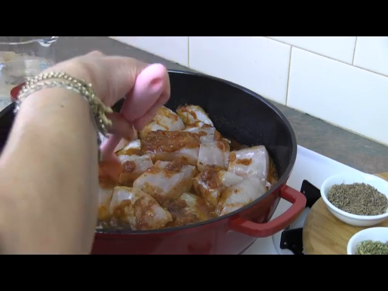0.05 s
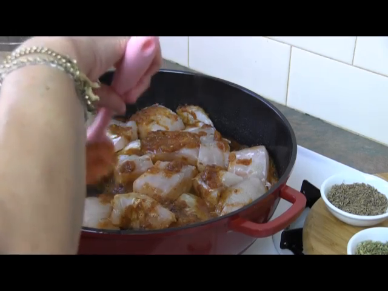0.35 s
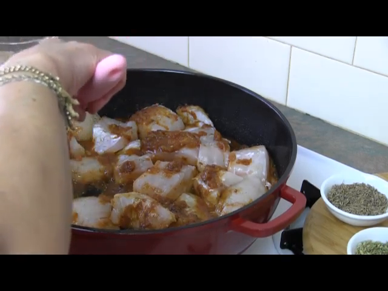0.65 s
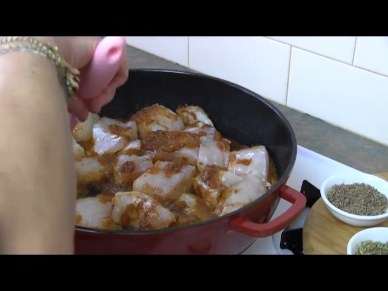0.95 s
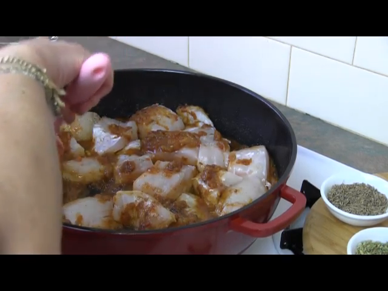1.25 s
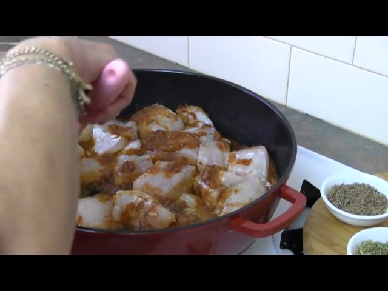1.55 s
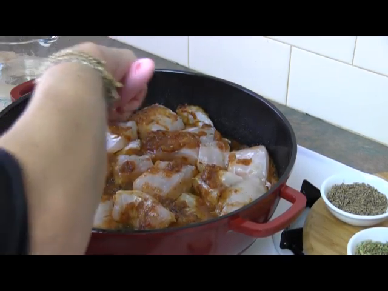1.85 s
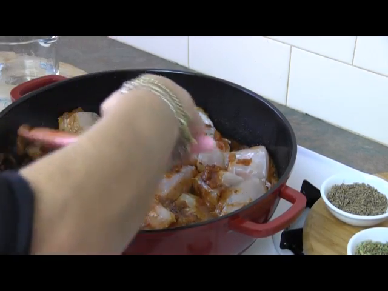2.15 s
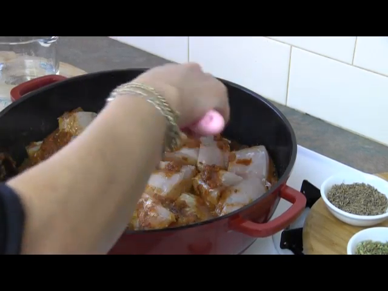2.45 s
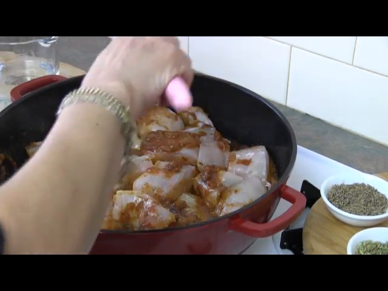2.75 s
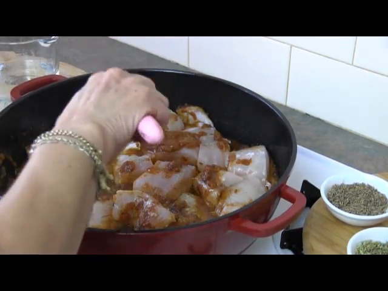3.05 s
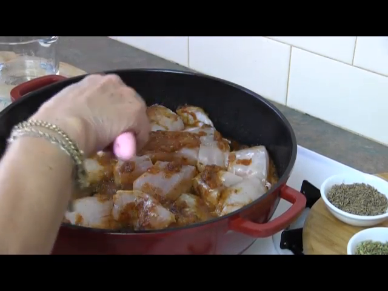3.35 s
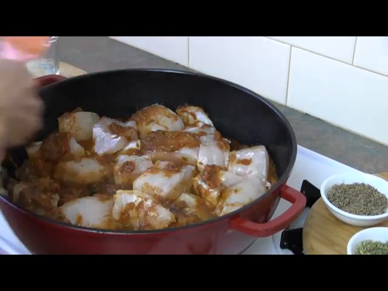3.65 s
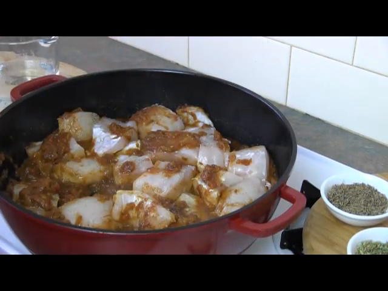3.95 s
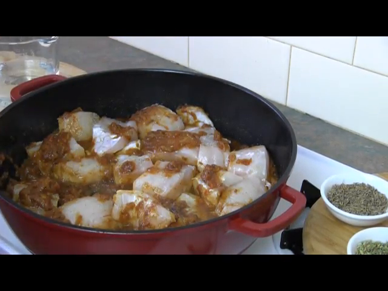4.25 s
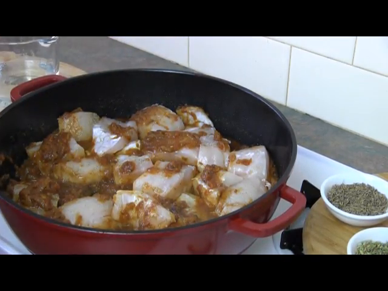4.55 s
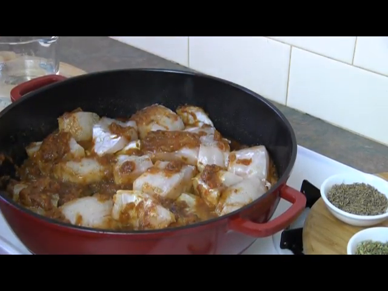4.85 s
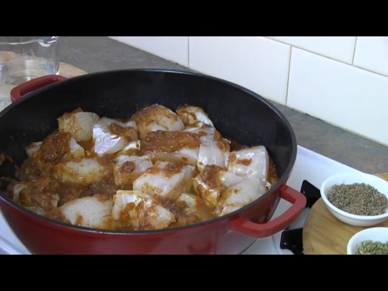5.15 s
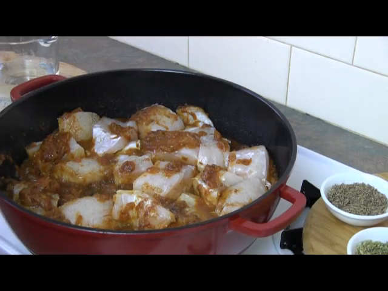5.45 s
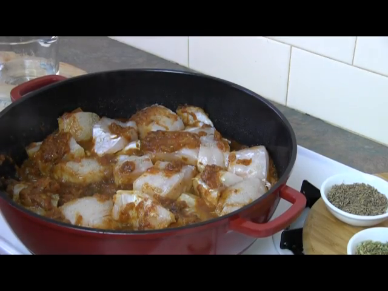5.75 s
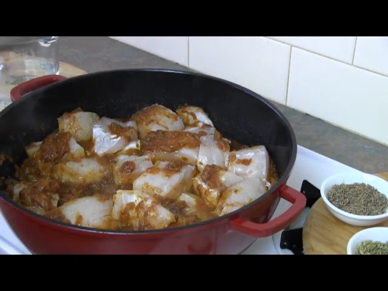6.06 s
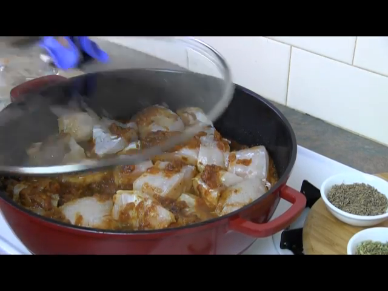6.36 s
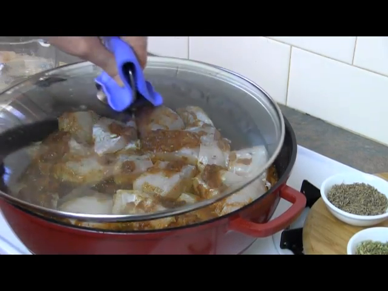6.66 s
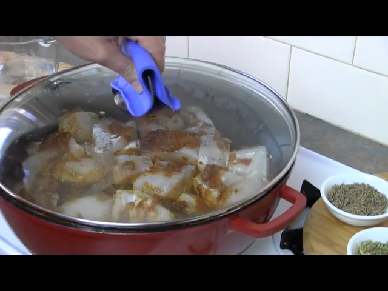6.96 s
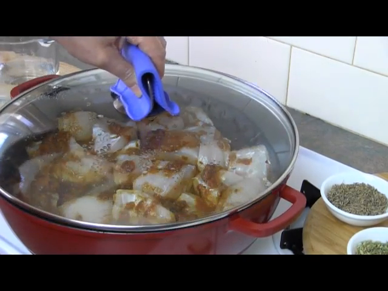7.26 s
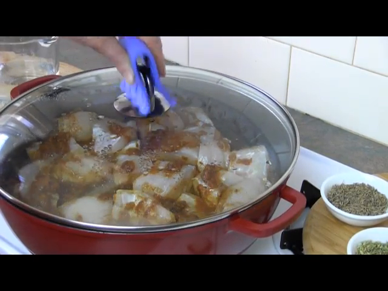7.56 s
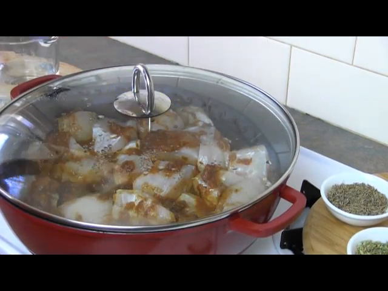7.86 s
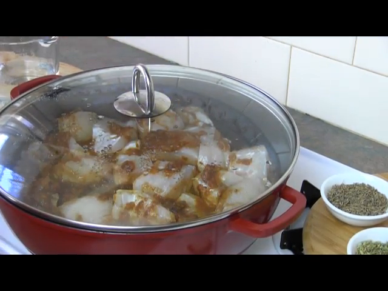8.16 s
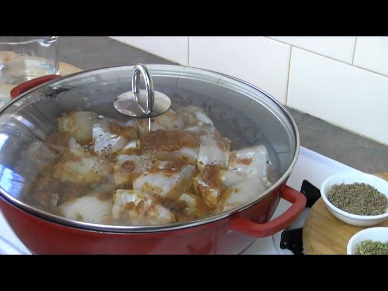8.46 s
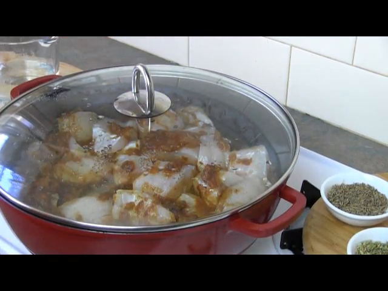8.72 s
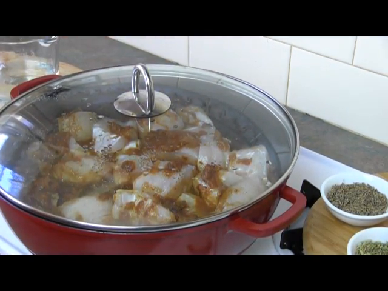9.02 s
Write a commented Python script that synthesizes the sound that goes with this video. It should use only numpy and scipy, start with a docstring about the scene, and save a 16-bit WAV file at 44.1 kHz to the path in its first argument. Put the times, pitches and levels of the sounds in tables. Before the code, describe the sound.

Sauce squelches softly as a spoon pats chicken in a faintly simmering pan. Chain bracelets tinkle brightly, then the spoon clacks onto its rest among a few dull knocks. After a soft cloth rustle, a glass lid strikes the iron pan, rocks, slides and drops into place with a sharp, ringing clatter. A few more bracelet clinks follow. The microphone is close to the stove in a small tiled kitchen.

```python
"""A small tiled kitchen, microphone close to the stove, over a steady low noise and a faint simmer.
A cook pats chicken pieces in an enamelled iron pan; the sauce squelches as the spoon lifts, and
the links of her chain bracelets tick and ring. She lays the spoon aside and fetches a glass lid.
It strikes the pan, rocks, slides and drops into its seat, each contact ringing glass, rim and iron."""
import sys
import numpy as np
from scipy import signal
from scipy.fft import rfft, irfft, next_fast_len
from scipy.io import wavfile
from scipy.ndimage import uniform_filter1d

SR = 44100
rng = np.random.default_rng(int(sys.argv[2]) if len(sys.argv) > 2 else 0)


def master_out(mix):
    """Clip the mix to full scale and print it as 16-bit PCM to the path in sys.argv[1]."""
    frames = np.transpose(np.atleast_2d(mix))
    ceiling = np.clip(frames, -1, 1)
    pcm = np.round(ceiling * 32767).astype(np.int16)
    wavfile.write(sys.argv[1], SR, pcm)


N = 409688


def amp(db):
    """Decibels to gain."""
    return 10 ** (np.asarray(db) / 20)


def unit(x):
    """Scales to an rms of 1."""
    return x / np.sqrt(np.mean(x ** 2) + 1e-20)


def read(points, hz):
    """Reads a curve on a log-frequency axis."""
    f, value = np.transpose(points)
    return np.interp(np.log(hz + 1), np.log(f), value)


def add(mix, s, sound):
    """Mixes a sound in at s seconds."""
    part = mix[:, max(round(s * SR), 0):][:, :sound.shape[-1]]
    part += sound[..., :part.shape[1]]


def noise(colour, size):
    """Two partly alike channels of noise at an rms of 1; colour gives dB for each Hz."""
    # Each row: frequency in Hz, correlation between left and right.
    likeness = [(60, 0.98), (130, 0.88), (260, 0.62), (700, 0.43), (2500, 0.62), (10000, 0.87)]
    hz = np.fft.rfftfreq(size, 1 / SR)
    mid, side = rfft(rng.standard_normal((2, size)))
    alike = np.clip(read(likeness, hz), 0, 1)
    mid, side = mid * np.sqrt(1 + alike), side * np.sqrt(1 - alike)
    return unit(irfft(np.array([mid + side, mid - side]) * amp(colour(hz)), size))


def bed(colour):
    """Coloured noise as long as the scene."""
    return noise(colour, next_fast_len(N))[:, :N]


def hump(centre_hz, octaves):
    """The colour of one resonance with straight skirts."""
    return lambda hz: -12 * (np.hypot(1, np.log2((hz + 1) / centre_hz) / octaves) - 1)


def grain(depth_db, smooth_samples, size):
    """A gain that flickers at random."""
    flicker = unit(uniform_filter1d(rng.standard_normal(size), smooth_samples))
    return unit(amp(depth_db * flicker))


def decay(t, t60):
    """A gain that falls 60 dB in t60 seconds."""
    return np.exp(-np.log(1000) * t / t60)


def fade(x, t60s, stretch=1):
    """Lets each band die at its own speed."""
    hz, t, bands = signal.stft(x, SR, nperseg=256)
    bands = bands * decay(t, stretch * read(t60s, hz)[:, None])
    return signal.istft(bands, SR, nperseg=256)[1][:, :x.shape[1]]


def ring(hz, db, t60, t):
    """A sum of dying modes, alternating in sign."""
    sign = (-1) ** np.arange(len(hz))
    return (sign * amp(db)) @ (np.sin(2 * np.pi * np.outer(hz, t)) * decay(t, t60[:, None]))


def spells(rows, rest_db, ramp_s):
    """A gain that rises from rest, holds through each spell and falls back."""
    t = np.arange(N) / SR
    lifts_db = [(db - rest_db) * np.clip(1 + np.minimum(t - start, end - t) / ramp_s, 0, 1)
                for start, end, db in rows]
    return amp(rest_db + np.max(lifts_db, axis=0))


def taps(rows, rise_s, snap_db=-20, snap_s=0.0013):
    """Short, damped blows, each noise in one resonance, opened by a brief snap."""
    out, t = np.zeros((2, N)), np.arange(2 ** 14) / SR
    for s, db, centre_hz, octaves, t60 in rows:
        envelope = np.minimum(t / rise_s, 1) * decay(t, t60) + amp(snap_db) * np.exp(-t / snap_s)
        add(out, s, amp(db) * envelope * noise(hump(centre_hz, octaves), len(t)))
    return out


def room(x, gap_s=.003, build_s=0.027):
    """Reflections off the tiles build into a short, diffuse tail."""
    # Each row: frequency in Hz, the kitchen's t60 in seconds.
    room_t60 = [(100, 0.55), (400, 0.43), (1500, 0.45), (4000, 0.26), (12000, 0.34)]
    onset = np.clip((np.arange(SR) / SR - gap_s) / build_s, 0, 1)
    tail = fade(noise(np.zeros_like, SR) * onset, room_t60)
    return signal.fftconvolve(x, tail / np.linalg.norm(tail[0]), axes=1)[:, :N]


def room_tone(level_db=-52.5):
    """The steady low noise of the kitchen."""
    # Each row: frequency in Hz, relative noise density in dB.
    colour = [(22, -36), (55, -6), (105, -2.5), (170, -8.5), (460, -7.5), (580, -4), (760, -4), (880, -11),
              (1600, -14), (2300, -14), (4000, -21), (8000, -28.5), (16000, -42)]
    return amp(level_db) * bed(lambda hz: read(colour, hz))


def rumble(centre_hz=50):
    """A deep rumble comes and goes."""
    # Each row: start and end of a swell in seconds, level in dB.
    swells = [(0, 2.75, -57.5), (3.6, 5.1, -59.5), (8, 8.8, -62.5)]
    return spells(swells, rest_db=-68, ramp_s=0.27) * bed(hump(centre_hz, octaves=0.38))


def hum(centre_hz=77):
    """A low, wavering hum swells twice."""
    # Each row: start and end of a swell in seconds, level in dB.
    swells = [(3.58, 4.08, -48), (6.2, 6.85, -56.5)]
    band = signal.hilbert(bed(hump(centre_hz, octaves=.05))[0])
    evened = unit(band.real / np.sqrt(abs(band) ** 2 + 0.18))  # nearly steady in level
    return spells(swells, rest_db=-63.5, ramp_s=0.23) * evened


def simmer(hiss_db=-1, pop_db=-8, pops_per_s=60, pop_hz=4500):
    """The warming pan hisses and pops faintly; the level dips as the lid goes on."""
    # Each row: time in seconds, level of the simmer in dB.
    levels = [(0, -61.5), (6.8, -62), (7.5, -64.5), (9.29, -61)]
    # Each row: frequency in Hz, relative density of the hiss in dB.
    colour = [(1500, -6), (3000, -2.5), (6000, -1), (10000, -3), (15500, -9)]
    hiss = bed(lambda hz: read(colour, hz))
    pops = (rng.random(N) < pops_per_s / SR) * amp(7.7 * np.minimum(rng.exponential(1, N), 3))
    pop = noise(hump(pop_hz, octaves=1), size=256) * np.exp(-np.arange(256) / 40)
    crackle = unit(signal.oaconvolve(pops[None], pop, axes=1)[:, :N])
    gain = amp(np.interp(np.arange(N) / SR, *np.transpose(levels)))
    return (amp(hiss_db) * hiss + amp(pop_db) * crackle) * gain


def rustles():
    """Cloth and pot holder rub in soft, grainy swells."""
    # Each row: peak time in seconds, level in dB, centre in Hz, width in octaves, half-length in seconds.
    brushes = [(5.36, -53, 2070, 0.96, 0.33), (6.054, -56.5, 1970, 1.3, 0.3),
               (8.087, -44, 2050, 1.02, 0.024), (8.733, -46, 1760, 1.35, 0.018),
               (9.026, -50, 5600, 1.4, 0.039)]
    out, t = np.zeros((2, N)), np.arange(2 ** 16) / SR
    middle = t.mean()
    for s, db, centre_hz, octaves, half_s in brushes:
        swell = np.exp(-((t - middle) / half_s) ** 2)
        roughness = grain(depth_db=4, smooth_samples=150, size=len(t))
        add(out, s - middle, amp(db) * roughness * swell * noise(hump(centre_hz, octaves), len(t)))
    return out


def knocks(middling_hz=300, middling_octaves=0.72, widest_octaves=1.26):
    """Things bump on counter and stove; heavier ones sound lower and narrower."""
    # Each row: start in seconds, level in dB, centre in Hz, t60 in seconds.
    bumps = [(.148, -46, 1290, .19), (1.385, -47.5, 151, 0.49), (4.287, -41.5, 800, 0.059),
             (4.321, -44, 900, 0.11), (4.416, -37, 130, 0.096), (4.604, -27.5, 680, 0.18),
             (4.735, -29.5, 270, .2), (4.737, -36, 119, 0.21), (5.004, -39, 271, 0.24),
             (5.267, -37.5, 131, 0.047), (6.125, -44.5, 300, 0.17)]
    blows = [(s, db, hz, min(middling_octaves * (hz / middling_hz) ** 0.63, widest_octaves), t60)
             for s, db, hz, t60 in bumps]
    return taps(blows, rise_s=0.00078)


def spoon():
    """The spoon clacks onto its rest and settles, ringing briefly each time."""
    # Each row: a mode's frequency in Hz, relative level in dB, t60 in seconds.
    modes = [(524, -1, 0.29), (549, -2.5, 0.33), (700, 1, 0.088), (970, -24, 0.14), (1280, -7, 0.18),
             (1776, -7, 0.1), (2620, -13, .09), (3060, 2, 0.037)]
    # Each row: start in seconds, level in dB.
    blows = [(4.604, -34.5), (4.655, -47)]
    out, t = np.zeros((2, N)), np.arange(2 ** 14) / SR
    for s, db in blows:
        add(out, s, amp(db) * ring(*np.transpose(modes), t))
    return out


def sauce(start_s=.1, end_s=2.3, tick_db=-55, tick_hz=4560, octaves=0.28, t60=0.06):
    """Sticky sauce parts at each lift of the spoon, with small wet ticks at random in between."""
    # Each row: start in seconds, level in dB, centre in Hz.
    squelches = [(.122, -47, 9350), (.264, -46, 3340), (.365, -47, 3320), (.654, -47, 3330),
                 (1.174, -46, 2930), (1.581, -47, 3500), (1.82, -44, 6960), (1.953, -44, 3420),
                 (2.341, -47, 3400)]
    ticks = [(start_s + (end_s - start_s) * when,
              tick_db + 3.5 * (2 * size - 1),
              tick_hz * 2 ** (0.72 * (2 * pitch - 1))) for when, size, pitch in rng.random((18, 3))]
    blows = [(s, db, hz, octaves, t60) for s, db, hz in list(squelches) + ticks]
    return taps(blows, rise_s=0.0011, snap_db=-1.5)


def clink(upper_db, tick_db, rise_s, links=4, spread=0.0092, lag_s=.003):
    """A few nearly equal bracelet links ring in quick succession over one grainy tick."""
    # Each row: a link mode's frequency in Hz, relative level in dB, t60 in seconds.
    modes = [(9000, 0, .075), (10610, -17, .055), (11350, -14, .055), (11880, -12, .06), (15000, -20, .04)]
    # Each row: frequency in Hz, relative density of the tick in dB.
    tick_colour = [(2000, -16), (4000, -2), (6500, -2.5), (9000, 8.5), (12000, -2.5), (15500, -15)]
    hz, db, t60 = np.transpose(modes)
    ringing, t = np.zeros((2, 2 ** 12)), np.arange(2 ** 12) / SR
    for k in range(links):
        detune, luck = rng.standard_normal((2, len(hz)))
        tone = ring(hz * (1 + spread * detune), db + (upper_db + 2 * luck) * (hz > hz[0]), t60, t)
        channel_db = -3 * k + 4.4 * rng.standard_normal((2, 1))
        add(ringing, k * lag_s, amp(channel_db) * tone)
    roughness = grain(depth_db=3, smooth_samples=60, size=len(t))
    tick = noise(lambda f: read(tick_colour, f), len(t)) * roughness * np.exp(-t / 0.021)
    return (ringing / abs(ringing).max() + amp(tick_db) * tick) * np.minimum(t / rise_s, 1)


def bracelets(jingle_db=-4, touches_per_s=14, voices=6):
    """The chains clink clearly when the wrist jerks, and jingle lightly at random in between."""
    # Dry ticks of the finest chain.
    # Each row: start in seconds, level in dB, centre in Hz, width in octaves, t60 in seconds.
    chain_ticks = [(6.245, -39.5, 10400, .4, 0.12), (9.18, -42, 15000, .05, .22)]
    # Each row: start in seconds, level in dB, kind of touch.
    clear_clinks = [(.656, -40.5, "bright"), (2.238, -37, "pure"), (2.5117, -30.5, "pure"),
                    (2.533, -29, "chatter"), (2.5682, -32.5, "chatter"), (2.583, -26.5, "pure"),
                    (2.6068, -26.5, "pure"), (2.722, -30, "chatter"), (2.747, -25, "chatter"),
                    (2.768, -28, "chatter"), (2.9073, -33.5, "pure"), (3.016, -32.5, "pure"),
                    (3.14, -27, "pure"), (3.199, -31, "chatter"), (3.219, -23, "pure"),
                    (3.3294, -33, "pure"), (3.38, -24, "pure"), (3.428, -25, "bright"),
                    (3.554, -15, "bright"), (3.5945, -25.5, "pure"), (3.743, -26.5, "bright"),
                    (4.049, -26.5, "bright"), (8.931, -32, "pure"), (9.0098, -23.5, "bright"),
                    (9.2543, -34, "pure")]
    # Each kind of touch: gain of the upper modes in dB, of the tick in dB, rise in seconds.
    touches = {"pure": (-11, -17, 0.003), "bright": (2.52, -22, 0.004), "chatter": (-1, -11.5, .0013)}
    # Each row: start and end of a wrist movement in seconds, level in dB.
    wrist_moves = [(0, 2.5, -61.5), (2.3, 3.9, -49.5), (3.9, 6.2, -62), (9, 9.29, -47)]
    out = taps(chain_ticks, rise_s=0.0018, snap_db=0)
    for s, db, touch in clear_clinks:
        add(out, s, amp(db) * clink(*touches[touch]))
    jingle = np.zeros((2, N))
    for _ in range(voices):
        hits = rng.random(N) < touches_per_s / voices / SR
        strength = amp(5 * np.minimum(rng.exponential(1, N), 2))
        voice = clink(upper_db=5, tick_db=-11.5, rise_s=0.003)
        jingle += signal.oaconvolve((hits * strength)[None], voice, axes=1)[:, :N]
    return out + amp(jingle_db) * unit(jingle) * spells(wrist_moves, rest_db=-74.5, ramp_s=.15)


def tilt(hz, db_per_octave):
    """A slope in dB about 1 kHz, flat below 150 Hz."""
    return db_per_octave * np.log2(np.maximum(hz, 150) / 1000)


def clatter(position, slope, stretch, size, level_db=-2):
    """Dense, quickly dying overtones of the glass lid and its steel rim."""
    # Each row: frequency in Hz, then relative density in dB on one edge, rocking, sliding and seated.
    colours = [(49.6, -13, -24, -17, -19), (121, -27, -6, -4, -3.5), (320, 3, 1, -1, -4.5),
               (750, -7.5, -3.5, -4, -4.5), (1060, -7.5, -14, -15, -9.5), (1670, -13, -15.5, -12, -8),
               (2290, -3, -6.5, -4.5, -3), (3760, -11, -10.5, -4, -10.5), (5230, -19, -14, -10.5, -17),
               (5670, -19.5, -17, -14.5, -30), (8900, -35.5, -32, -26, -34.5), (15700, -63, -52, -42, -43)]
    # Each row: frequency in Hz, t60 in seconds before the stretch.
    t60s = [(80, 0.89), (400, 0.25), (1500, 0.24), (3000, 0.097), (6000, 0.13), (14000, 0.18)]
    colour = np.array(colours)[:, [0, position + 1]]
    overtones = noise(lambda hz: read(colour, hz) + tilt(hz, slope), size)
    return amp(level_db) * fade(overtones, t60s, stretch)


def lid(hard_db=-12.5, hard_rise_s=.0015, snap_db=-4, snap_rise_s=0.00055):
    """Each contact rings lid and pan; softer ones rise more slowly, sound duller and clatter longer."""
    # Modes of the lid on the pan. Each row: frequency in Hz, t60 in seconds,
    # then relative level in dB on one edge, rocking, sliding and seated.
    modes = [(134.5, 0.33, -36.5, -35, -39, -29), (155.5, 0.37, -28.5, -29, -38, -32),
             (193, 0.41, -49, -24.5, -41, -39), (250, 0.27, -28.5, -19, -22.5, -26),
             (297, 0.34, -55, -22, -30, -19), (372.7, 0.17, -7, -31, -49, -20.5),
             (394.9, 0.35, -21.5, -12.5, -38, -30), (591.6, 0.16, -14.5, -19, -31.5, -24),
             (667, 0.16, -17, -22, -47, -24), (700, 0.25, -32, -40, -46, -19),
             (741, 0.14, -16, -23, -31.5, -22), (771.6, 0.2, -37, -33, -28, -20.5),
             (1006, 0.24, -33, -40, -56, -31), (1150, 0.17, -42, -43, -56, -19.5),
             (1167, 0.27, -53, -32.5, -33, -33), (1237, 0.077, -23.5, -39, -44, -35),
             (1533, 0.21, -51, -38, -41.5, -23.5), (1965, 0.2, -22, -26, -43, -28),
             (2198, 0.11, -30, -50, -38, -29), (2385, 0.16, -18, -41, -46, -24),
             (2436, 0.14, -14.5, -29, -27, -31), (2580, 0.16, -34, -36, -36, -31),
             (2743, 0.065, -36, -35, -51, -38), (3060, 0.16, -50, -43, -29.5, -26),
             (3310, 0.23, -47, -52, -47, -37), (3310, 0.08, -31, -42, -51, -29),
             (3615, 0.044, -15, -28, -51, -30), (4320, 0.2, -37, -48, -35, -48)]
    # How the lid lies on the pan, in the order of those level columns.
    positions = ["edge", "rock", "slide", "seat"]
    # Each kind of contact: position, brightness in dB an octave, factor on the clatter's decay time.
    contacts = {"strike": ("edge", -1.1, 0.57), "graze": ("edge", 5.4, 0.62), "rock": ("rock", 0.53, .9),
                "scrape": ("slide", 7.2, 0.57), "slide": ("slide", .3, .5), "drop": ("seat", -.2, 0.7)}
    # The lid is picked up, strikes, rocks, slides and drops in.
    # Each row: start in seconds, kind of contact, gain of the ring in dB, of the clatter in dB.
    blows = [(5.001, "graze", -29.5, -37.5), (6.794, "strike", -1, -10.5), (6.7995, "graze", -18.5, -17.5),
             (6.881, "rock", -1.5, -14.5), (6.928, "rock", -21.5, -27), (6.985, "rock", -19.5, -27),
             (7.018, "slide", -13, -32), (7.131, "scrape", -22, -27), (7.141, "slide", .5, -21.5),
             (7.211, "slide", -10.5, -25), (7.222, "slide", -11.5, -36), (7.298, "slide", -18.5, -40),
             (7.377, "drop", -22, -31), (7.3876, "drop", -1.5, -9.5), (7.634, "drop", -31.5, -38)]
    out, t = np.zeros((2, N)), np.arange(2 ** 15) / SR
    hz, t60, *mode_db = np.transpose(modes)
    for s, contact, ring_db, clatter_db in blows:
        lie, brightness, stretch = contacts[contact]
        position = positions.index(lie)
        softer_db = hard_db - clatter_db
        slope = brightness - 0.1424 * softer_db
        rise_s = hard_rise_s * 2 ** (softer_db / 25)
        tone = ring(hz, ring_db + mode_db[position] + tilt(hz, slope), t60, t)
        crash = amp(clatter_db) * clatter(position, slope, stretch * 2 ** (softer_db / 26.5), len(t))
        add(out, s, (tone + crash) * np.minimum(t / rise_s, 1))
    # On the hardest drop the rim snaps into its seat.
    _, seat_s = max((ring_db, s) for s, contact, ring_db, _ in blows if contact == "drop")
    snap = amp(snap_db) * clatter(positions.index("seat"), slope=0, stretch=0.075, size=len(t))
    add(out, seat_s, snap * np.minimum(t / snap_rise_s, 1))
    return out


def scene(lid_room_db=-11, wrist_room_db=-12, counter_room_db=-7):
    """Lid and wrist are close to the microphone, fairly dry, a touch right; the counter is further off."""
    pan = lid() * amp([[-.7], [.7]])
    wrist = (bracelets() + sauce()) * amp([[-.4], [.4]])
    counter = knocks() + spoon() + rustles()
    reflections = room(amp(lid_room_db) * pan + amp(wrist_room_db) * wrist
                       + amp(counter_room_db) * counter)
    background = (room_tone() + rumble() + hum() + simmer()) * amp([[-.45], [.45]])
    return pan + wrist + counter + reflections + background


def record(dry):
    """The loudest peaks are rounded off and the highest treble is cut."""
    rounded = dry / (1 + dry ** 6) ** (1 / 6)
    low_pass = signal.firwin(511, cutoff=15800, window=("kaiser", 9), fs=SR)
    return signal.oaconvolve(rounded, low_pass[None], "same")


dry = scene()
out = record(dry)
master_out(out)
```